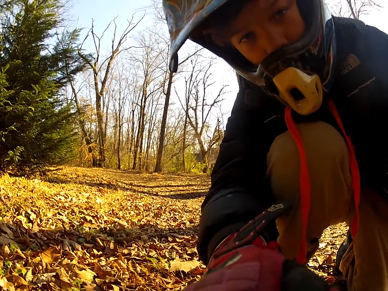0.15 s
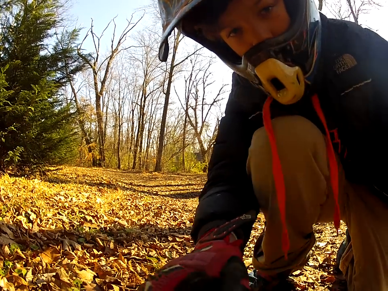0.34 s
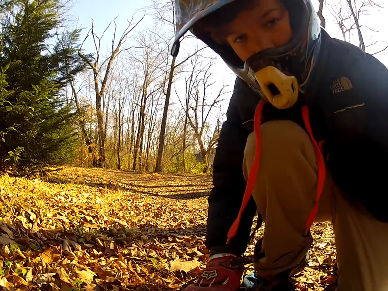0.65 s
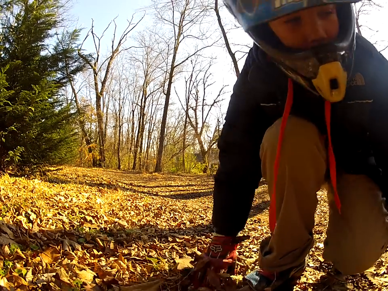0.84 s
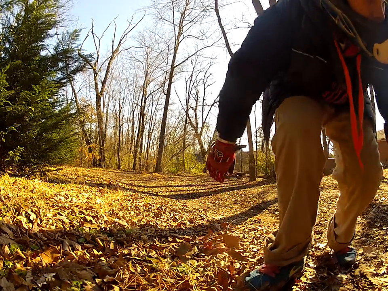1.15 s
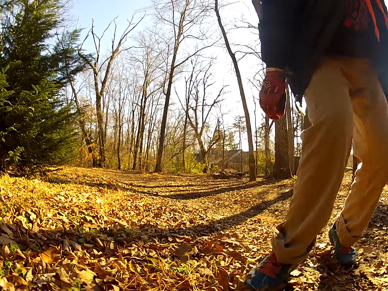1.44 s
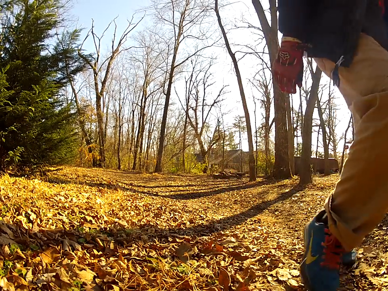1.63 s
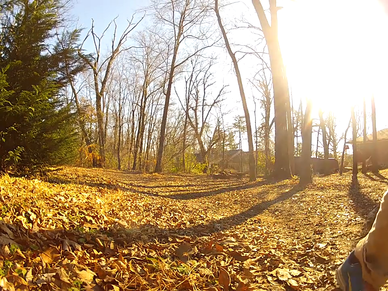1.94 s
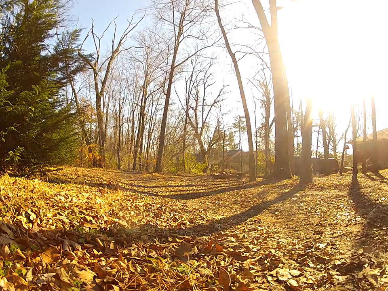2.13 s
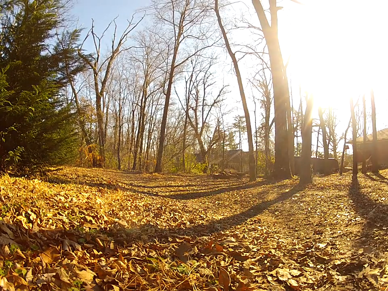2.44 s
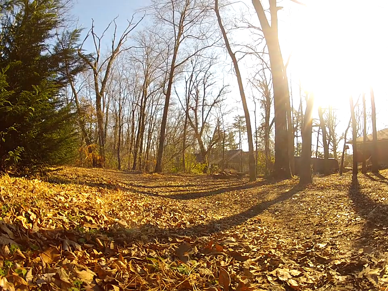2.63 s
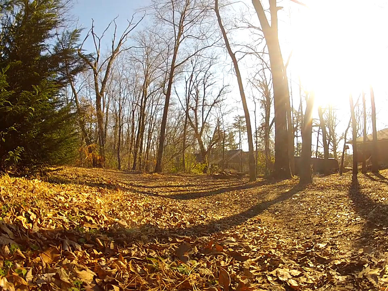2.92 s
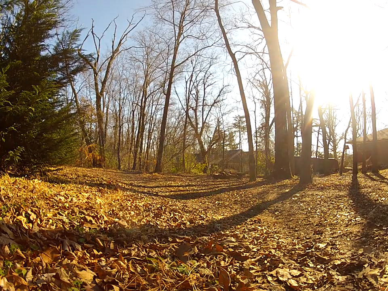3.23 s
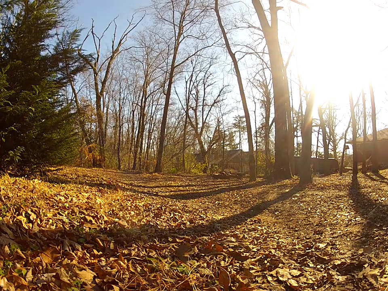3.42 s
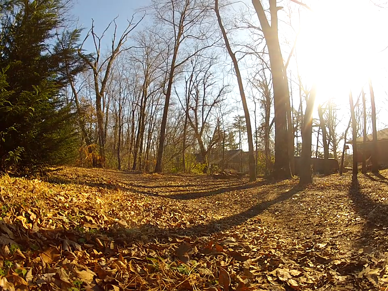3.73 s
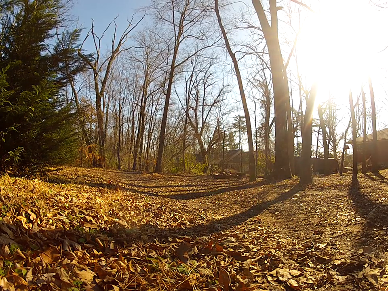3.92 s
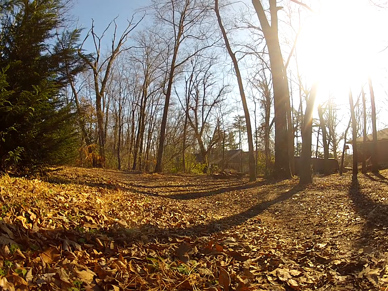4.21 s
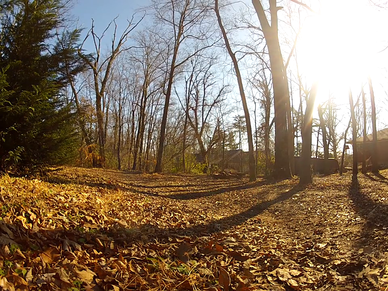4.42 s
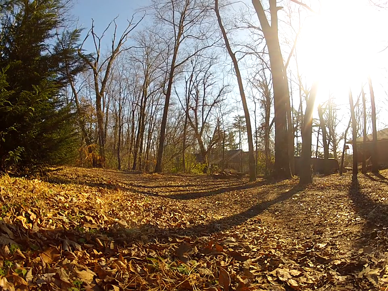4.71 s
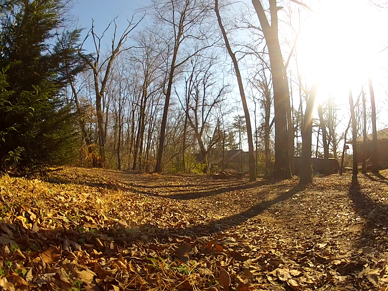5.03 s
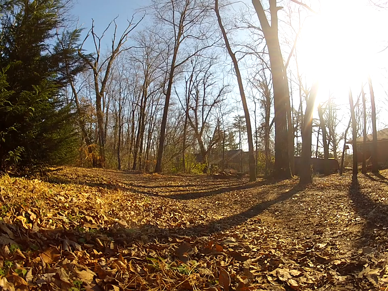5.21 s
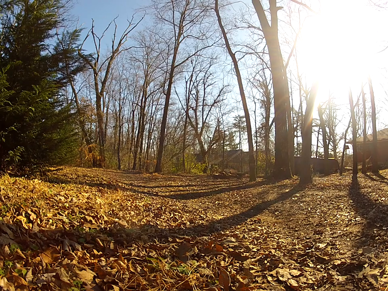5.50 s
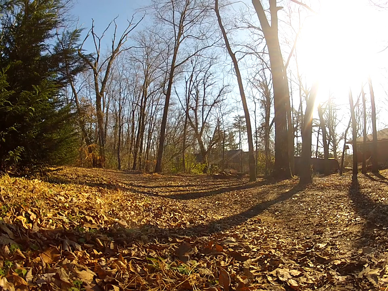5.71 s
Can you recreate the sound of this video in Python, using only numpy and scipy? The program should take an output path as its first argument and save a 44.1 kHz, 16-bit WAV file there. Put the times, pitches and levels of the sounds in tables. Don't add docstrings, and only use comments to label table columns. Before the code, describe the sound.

A four-wheeler idles in the woods while gloved hands knock and scrape a small camera, then it throttles away, eases off and picks up again.

```python
import sys
import numpy as np
from scipy import signal
from scipy.fft import rfft, irfft, next_fast_len
from scipy.io import wavfile
from scipy.ndimage import map_coordinates

SR = 44100
rng = np.random.default_rng(int(sys.argv[2]) if len(sys.argv) > 2 else 0)


def generate_wav(signal):
    frames = np.transpose(np.atleast_2d(signal))
    scaled = np.clip(frames, -1, 1) * 32767
    pcm = np.round(scaled).astype(np.int16)
    wavfile.write(sys.argv[1], SR, pcm)


def gain_from_db(level_db):
    decades = np.asarray(level_db, float) / 20
    return 10 ** decades


N = 258558
TIME_S = np.arange(N) / SR


def unit(x):
    return x / np.sqrt(np.mean(x ** 2) + 1e-20)


def curves(rows):
    s, *cols = np.transpose(rows)
    return [np.interp(TIME_S, s, c) for c in cols]


def filtered(x, response):
    m = next_fast_len(N + SR)
    return irfft(rfft(x, m) * response(np.fft.rfftfreq(m, 1 / SR)), m)[:N]


def modes(rows):
    signed = [(*row, (-1) ** k)[:4] for k, row in enumerate(rows)]

    def response(f):
        return sum(np.sign(sign) * gain_from_db(db) * 1j * f * width / (hz * hz - f * f + 1j * f * width)
                   for hz, width, db, sign in signed)
    return response


def noise():
    return rng.standard_normal(N)


def coloured(x, rows):
    return unit(filtered(x, modes(rows)))


def wobble(rate_hz):
    knots = rng.standard_normal(int(N * rate_hz / SR) + 4)
    return map_coordinates(knots, [np.arange(N) * rate_hz / SR])


def spikes(times_s, sizes):
    at = np.clip(np.round(times_s * SR).astype(int), 0, N - 1)
    return np.bincount(at, sizes, N)


def crackle(rate_hz, spread_db, hiss):
    size = gain_from_db(spread_db * rng.exponential(size=N)) * noise()
    return unit(size * (rng.random(N) < rate_hz / SR)) + hiss * noise()


def strokes(rows):
    edge_db = 30
    levels_db = []
    for start_s, db, rise_s, hold_s, fall_s in rows:
        before = (start_s - TIME_S) / abs(rise_s)
        after = (TIME_S - start_s - hold_s) / abs(fall_s)
        levels_db.append(db - edge_db * np.maximum(np.maximum(before, after), 0))
    return gain_from_db(np.max(levels_db, axis=0))


# freq_hz, density_db_per_hz
AIR_SPECTRUM = [(30, 8.5), (150, -8), (350, -23), (1050, -39.5), (1900, -38.5), (2280, -54), (2750, -39),
                (3400, -69), (3620, -38.5), (3950, -44.5), (4800, -46.5), (5050, -36.5), (5500, -49),
                (6000, -42)]


def wood():
    f, db = np.transpose(AIR_SPECTRUM)

    def response(hz):
        shape_db = np.interp(np.log(hz + 300), np.log(f + 300), db)
        return gain_from_db(shape_db) * (hz / (hz + 150)) ** 2
    return gain_from_db(-58) * gain_from_db(wobble(4.9)) * unit(filtered(noise(), response))


# peak_start_s, level_db, rise_s, hold_s, fall_s
LEAF_STROKES = [(.45, -70, .3, .01, .2), (.59, -65, 0.26, .06, .1), (.692, -55, 0.11, .11, .1),
                (.818, -49, 0.14, 0.14, .12), (.95, -54.5, .05, 0.062, 0.057), (1.03, -63, .05, .02, 0.51),
                (1.1, -78, .1, .15, .1), (1.36, -67.5, 0.32, .01, 0.079), (1.416, -61.5, 0.02, .002, 0.037),
                (1.506, -67, .03, .2, .05), (1.796, -48.5, 0.051, 0.0016, 0.057),
                (1.84, -68.5, .05, 0.12, .07), (1.984, -70, .08, .002, .07),
                (2.094, -45, 0.064, .002, 0.05), (2.13, -64, .05, .002, 0.15),
                (2.242, -74, .015, .002, .15), (5.258, -50, 0.009, 0.0083, 0.019)]
# freq_hz, width_hz, level_db
LITTER = [(1170, 204, -4), (2353, 140, 4.5), (3150, 380, -0.5), (3680, 116, 6.5), (4700, 1300, -4.5),
          (5820, 1760, -3)]


def leaves():
    clumps = gain_from_db(0.35 * wobble(90))
    snaps = crackle(rate_hz=5000, spread_db=2.5, hiss=.9)
    return strokes(LEAF_STROKES) * coloured(clumps * snaps, LITTER)


# start_s, peak_db, pitch_hz, t60_s
TAPS = [(.002, -35, 200, 0.017), (.012, -38.5, 300, 0.026), (.036, -40, 109, 0.052),
        (0.04, -43, 395, 0.018), (0.087, -37.5, 320, 0.019), (.118, -41, 288, 0.026),
        (0.118, -40, 150, 0.1), (0.119, -44, 550, 0.035), (.281, -35.5, 258, 0.028),
        (.289, -35, 303, 0.061), (0.295, -36.5, 60, 0.11), (.3, -59, 700, 0.018),
        (0.32, -42.5, 1030, 0.017), (.418, -54, 600, 0.033), (.445, -44, 1530, 0.0072),
        (0.45, -49, 1100, 0.011), (.58, -57, 600, 0.053), (.61, -43, 1050, 0.011),
        (.82, -43.5, 1170, 0.047), (0.821, -39, 1750, 0.028), (.83, -44, 850, 0.011),
        (0.836, -43.5, 275, 0.025), (0.86, -39, 1770, 0.011), (0.862, -39, 1100, 0.0065),
        (1.789, -54, 1150, 0.034), (2.085, -48, 1150, 0.046), (2.118, -42.5, 126, 0.14),
        (2.147, -53, 252, 0.032)]


def taps():
    out, t = np.zeros(N + SR), np.arange(SR // 8) / SR
    for start_s, db, hz, t60_s in TAPS:
        attack = 1 - np.exp(-t / 0.000065)
        ring = np.sin(2 * np.pi * hz * t) * gain_from_db(-60 * t / t60_s) * attack
        band = signal.butter(1, [.5 * hz, 1.6 * hz], "band", fs=SR)
        puff = unit(signal.lfilter(*band, rng.standard_normal(len(t))))
        puff = 0.21 * puff * gain_from_db(-60 * t / (1.6 * t60_s))
        out[round(start_s * SR):][:len(t)] += gain_from_db(db) * (ring + puff)
    return out[:N]


# peak_start_s, level_db, rise_s, hold_s, fall_s
RUB = [
    (0, -53, .01, 0.12, 0.095),
]
# peak_start_s, level_db, rise_s, hold_s, fall_s
FUMBLE = [(.27, -51, .005, .056, .01), (.418, -58, .02, 0.06, .035), (.612, -52.5, 0.17, .001, 0.035),
          (.63, -61.5, .02, 0.078, .01), (.824, -63, .03, 0.0046, 0.07), (.84, -65, .02, .03, .3)]
# time_s, level_db, pressure_0_1
SCRAPE = [
    (.203, -70, 0),
    (.206, -47, .1),
    (.228, -42, .4),
    (.25, -39.5, .75),
    (.276, -42.5, .9),
    (.284, -60, .5),
    (.29, -75, .5),
]
# freq_hz, width_hz, level_db
SHELL = [(1150, 220, -2.5), (1930, 290, -2), (2350, 170, -4), (3100, 410, -16), (3660, 100, -7.5),
         (5240, 250, -7.5)]
# freq_hz, width_hz, level_db
SEAM_LIGHT = [(980, 350, -15.5), (1913, 86, 2), (2300, 270, -14), (3620, 380, -15)]
# freq_hz, width_hz, level_db
SEAM_PRESSED = [(2460, 270, -1.5), (3340, 310, -2), (3760, 91, 9), (5360, 2000, -12.5)]
# freq_hz, width_hz, level_db
MOUNT = [(600, 330, -0.5), (1130, 430, -3), (1750, 160, -8)]


def glove():
    slips = gain_from_db(1.3 * wobble(140))
    grip = crackle(rate_hz=6000, spread_db=1.2, hiss=1)
    shell, light, pressed = [unit(slips * filtered(grip, modes(body)))
                             for body in (SHELL, SEAM_LIGHT, SEAM_PRESSED)]
    start_s, level_db, _ = np.transpose(SCRAPE)
    scrape_gain = gain_from_db(np.interp(TIME_S, start_s, level_db, left=-150, right=-150))
    pressure = curves(SCRAPE)[1]
    scrape = scrape_gain * (light + pressure * pressed)
    ticks = crackle(rate_hz=1500, spread_db=2.5, hiss=.6)
    fumble = gain_from_db(-5) * strokes(FUMBLE) * coloured(ticks, MOUNT)
    return strokes(RUB) * shell + scrape + fumble


IDLE_PER_S, FULL_PER_S = 11, 55
# time_s, gas_level_db, throttle_0_1, turned_away_0_1
DRIVE = [(0, -66.5, 0, 0.3), (3.1, -66.5, 0.3, 0.46), (3.2, -61.5, .3, 0.53), (3.25, -49, 0.83, 0.28),
         (3.3, -45.5, 1, 0.4), (3.45, -47.5, 0.89, 0.41), (3.62, -44.5, 0.88, 0.37),
         (3.95, -43.5, 0.87, 0.29), (4.2, -42, 0.93, 0.47), (4.38, -43, 0.95, 0.36), (4.55, -45.5, 1, 0.8),
         (4.82, -48, 0.06, 0.77), (4.92, -52.5, 0, 0.56), (5.0, -57, 0, 0.61), (5.24, -60, 0.4, 0.81),
         (5.3, -54.5, 1, 0.86), (5.45, -58, 0.77, 0.83), (5.86, -57.5, 0.92, 0.82)]


def drive(speed):
    clutch_s, bite_s = 3.464, 0.33
    hot_revs = 0.38
    gas_db, throttle, away = curves(DRIVE)
    shut, away = 1 - np.clip(throttle, 0, 1), np.clip(away, 0, 1)
    revs = np.clip((speed - IDLE_PER_S) / (FULL_PER_S - IDLE_PER_S), 0, 1)
    load = np.clip((TIME_S - clutch_s) / bite_s, 0, 1)
    heat = np.clip(revs / hot_revs, 0, 1) * (1 - 0.73 * load)
    blur = 0.76 * revs ** 2 + 0.54 * shut
    return gas_db, shut, away, revs, load, heat, blur


# order_per_firing, over_gas_db, idle_to_full_swing_half_db, turned_away_db
ORDERS = [(2, -2, 4, 5.5), (3, -15, -10.5, 13.5), (4, -13, 16, 2), (5, -12, 1.5, 3), (6, -15, -3, 4),
          (7, -20, 7.5, 5), (8, -12, 1.5, -7.5), (9, -9.5, -7, -14), (10, -12.5, -8, -9.5),
          (13, -15.5, -0.5, -4.5)]


def hum(turns, gas_db, revs, away):
    asleep_db = -34 * np.clip(1 - revs / 0.39, 0, 1)
    out = np.zeros(N)
    for order, over_gas_db, rise_db, away_db in ORDERS:
        db = gas_db + over_gas_db + rise_db * (2 * revs - 1) + away_db * away + asleep_db
        level = np.sqrt(2) * gain_from_db(db + wobble(22.54) / 2)
        out += level * np.cos(2 * np.pi * round(order) * turns - .45)
    return out


def frame(turns, gas_db, pop_db, revs, away):
    rumble = gain_from_db(pop_db - 24) * coloured(noise(), [(55, 20, 0)])
    rock_db = gas_db + 5.5 - 51 * (1 - revs) - 0.5 * away
    rock = gain_from_db(rock_db + 1.2 * wobble(22)) * np.cos(2 * np.pi * turns + .6 * wobble(11))
    return rumble + rock


def churn(gate, pop_db, heat, speed):
    swirl = unit(filtered(noise(), lambda f: 1j * f / (150 + 1j * f) / (1 + 1j * f / 300) ** 2))
    level_db = pop_db - 23 + 13 * (1 - heat) - 7 * speed / FULL_PER_S
    return gain_from_db(level_db + wobble(9)) * np.sqrt(gate) * swirl


# freq_hz, width_hz, level_db
SHIELD = [(2116, 119, 3.5), (2443, 64, 8), (4330, 880, -11.5)]
# freq_hz, width_hz, level_db
SLOW_SHIELD = [(2420, 97, 8.5), (4500, 280, -6)]
# freq_hz, width_hz, over_rattle_db
PING = [(2390, 59, 35)]


def shield(fired, chance, puff, rattle_db, blur, slow):
    knock = np.convolve(spikes(fired, gain_from_db(1.6 * chance[:, 3])), puff)[:N]
    knock += (.03 + .5 * np.abs(blur)) * gain_from_db(2 * wobble(60))
    fast_tin, slow_tin = [coloured(noise(), body) for body in (SHIELD, SLOW_SHIELD)]
    rattle = gain_from_db(rattle_db + 4) * knock * ((1 - slow) * fast_tin + slow * slow_tin)
    strikes = spikes(fired + .001, gain_from_db(3 * chance[:, 3])) * slow * gain_from_db(rattle_db)
    return rattle + filtered(strikes, modes(PING))


# freq_hz, width_hz, level_db
HOUSING = [(540, 220, -7.5), (971, 97, -4.5), (1170, 188, 1.5), (1690, 47, -1.5), (2174, 244, 3.5),
           (2307, 214, 5.5), (3020, 420, -11), (3733, 94, -1.5), (4640, 910, -10), (4960, 160, -16)]
# freq_hz, width_hz, level_db
FAR_SIDE = [(700, 830, -14.5), (1100, 210, -3), (2327, 335, 0.5), (2231, 101, 5), (3300, 570, -9.5),
            (4510, 410, -10.5), (5860, 740, -17)]


def gas_jet(gate, gas_db, away):
    gas = crackle(rate_hz=6000, spread_db=2, hiss=.9)
    near, far = [coloured(gas, body) for body in (HOUSING, FAR_SIDE)]
    return gain_from_db(gas_db - 3) * gate * ((1 - away) * near + away * far)


# freq_hz, width_hz, level_db
CRACK = [(1170, 96, -44), (2240, 1300, -14.5), (3110, 500, -2), (3603, 510, 0), (4700, 2400, -5),
         (5150, 1700, -4)]
# freq_hz, width_hz, level_db
FAR_CRACK = [(1190, 130, -7), (2465, 79, 2), (3400, 700, -8), (4400, 300, -5)]


def shock(fired, chance, hot, gas_db, revs, shut, away):
    t = np.arange(SR // 12) / SR
    shape = .35 * (t / .0017) ** 3 * np.exp(-t / .0017)
    starts_s = fired - .0038 + .003 * (1 - hot) + .001 * chance[:, 2]
    head = np.convolve(spikes(starts_s, gain_from_db(1.5 * chance[:, 0])), shape)[:N]
    front, back = [coloured(noise(), body) for body in (CRACK, FAR_CRACK)]
    level_db = gas_db + 19.5 - 10.5 * revs - 14 * shut
    return gain_from_db(level_db) * head * ((1 - away ** 2) * front + away ** 2 * back)


# freq_hz, width_hz, level_db, sign
COOL_PIPE = [(60, 25.6, -13, 1), (97.86, 5.46, 3.5, -1), (116, 7.1, -11, 1), (150, 61, -16.5, -1),
             (172.8, 9, -13.5, -1), (250, 38, -20.5, 1), (307, 42, -19, -1), (391, 8.3, -17.5, 1)]
# freq_hz, width_hz, level_db, sign
HOT_PIPE = [(57, 5, -32, 1), (111.5, 27.5, 3, 1), (150, 81, -7, -1), (199, 10.6, -8, 1), (289, 10, 1, -1),
            (300.5, 3.4, -3, 1), (407, 16, -4.5, -1)]
# freq_hz, width_hz, level_db, sign
OPEN_PIPE = [(77, 20, -10.5, 1), (122, 25, -9, 1), (200, 34, -22, 1), (262.5, 7.2, -11.5, 1),
             (320, 21, -8, 1), (416, 12, -13, 1), (466, 27, -21.5, 1)]
# freq_hz, width_hz, level_db
THUMP = [(150, 58, -10)]


def exhaust(blow, boom_db, pop_db, heat, slow):
    def soft(rows):
        return lambda f: modes(rows)(f) / (1 + 1j * f / 230) ** 2
    scale = np.sqrt(SR * SR / 30)
    cool = filtered(blow * (1 - heat) * gain_from_db(boom_db), soft(COOL_PIPE))
    warm = filtered(blow * heat * gain_from_db(boom_db - 1), soft(HOT_PIPE))
    pop = filtered(blow * gain_from_db(pop_db - 9), lambda f: modes(OPEN_PIPE)(f) / (1 + 1j * f / 400) ** 3)
    thump = filtered(blow * slow * gain_from_db(pop_db - 9), soft(THUMP))
    radiated = filtered(warm + pop + thump, lambda f: (1j * f / (38 + 1j * f)) ** 2)
    return scale * (cool + radiated)


# time_s, firings_per_s
SPEED = [(0.0, 10.563), (1.06, 10.962), (3.06, 10.801), (3.19, 9.662), (3.27, 18.457), (3.45, 27.359),
         (3.65, 31.452), (4.0, 31.991), (4.14, 39.557), (4.56, 47.964), (4.79, 54.222), (4.86, 52.085),
         (4.91, 44.647), (5.15, 35.127), (5.25, 36.478), (5.36, 29.92), (5.6, 30.598), (5.87, 34.595)]


def engine():
    first_turn = 1.259
    speed, = curves(SPEED)
    gas_db, shut, away, revs, load, heat, blur = drive(speed)
    boom_db = gas_db + 13 - 29 * revs + 4.5 * away * load + shut * (2 + 11.5 * load)
    pop_db = gas_db - 2.5 + load * (13 + 8.5 * away - 5.5 * revs)
    rattle_db = gas_db - 29.5 + load * (25.5 + 9.5 * away) + 23 * shut * (1 - load)
    slow = np.clip(1.9 * away * (1 - speed / FULL_PER_S), 0, 1) * away

    turns = np.cumsum(speed) / SR - first_turn
    fired = np.interp(np.arange(-1, turns[-1]), turns, TIME_S)
    chance = rng.standard_normal((len(fired), 4))
    hot = np.interp(fired, TIME_S, heat)
    even = 1 / np.sqrt(np.interp(fired * SR, np.arange(N), speed))
    blow = spikes(fired - .001 + .00006 * chance[:, 0], even * gain_from_db(.45 * chance[:, 1]))

    t = np.arange(SR // 12) / SR
    puff = (1 - np.exp(-t / .0024)) * np.exp(-t / .0065)
    main = spikes(fired + .0015 * (1 - hot) - .0015, gain_from_db(1.03 * chance[:, 2]))
    lead = spikes(fired - .0045, 0.94 * hot)
    gate = np.convolve(main + lead, puff)[:N]
    gate = (gate + 0.16 + .5 * np.abs(blur)) / np.sqrt(0.032 + 0.0019 * speed)

    low = hum(turns, gas_db, revs, away) + frame(turns, gas_db, pop_db, revs, away)
    gas = churn(gate, pop_db, heat, speed) + gas_jet(gate, gas_db, away)
    crack = shock(fired, chance, hot, gas_db, revs, shut, away)
    tin = shield(fired, chance, puff, rattle_db, blur, slow)
    return low + gas + crack + tin + exhaust(blow, boom_db, pop_db, heat, slow)


def scene():
    return (wood() + leaves() + taps() + glove() + engine())[None]


def band_limit(x):
    return signal.sosfilt(signal.butter(12, 15990, fs=SR, output="sos"), x)


def record(dry):
    hold_hz = 12000
    limited = filtered(dry[0], lambda hz: 1 / (1 + (hz / 5750) ** 16))
    slow = signal.resample_poly(limited, hold_hz, SR, window=("kaiser", 2))
    held = signal.resample_poly(np.repeat(slow, 4), SR, 4 * hold_hz)[:N]
    held = filtered(held, lambda hz: 1 / (1 + (hz / 15450) ** 70))
    return band_limit(held[None])


dry = scene()
out = record(dry)
generate_wav(out)
```